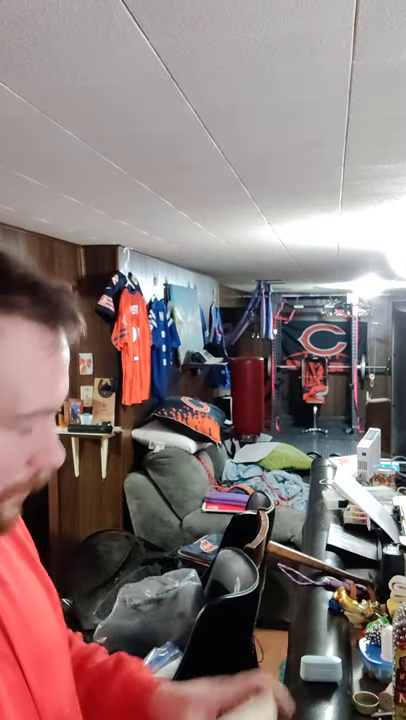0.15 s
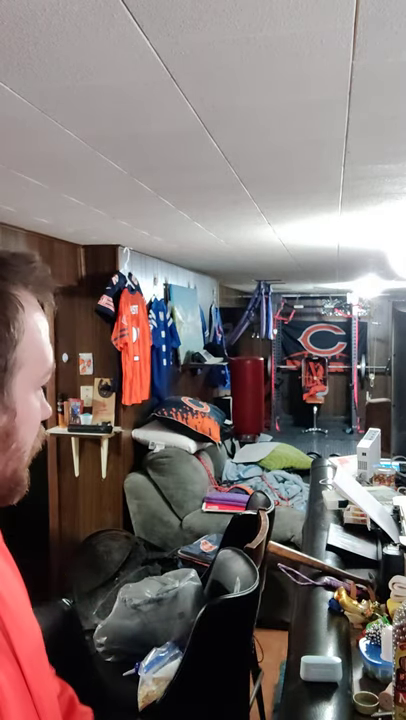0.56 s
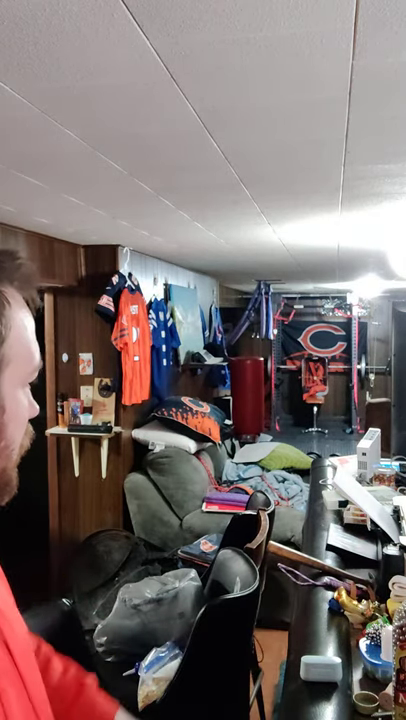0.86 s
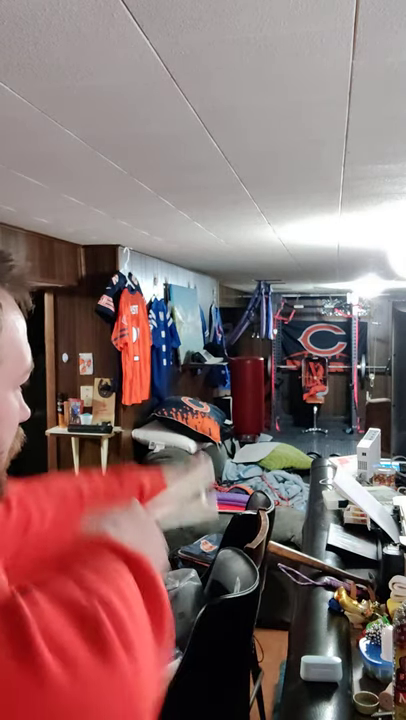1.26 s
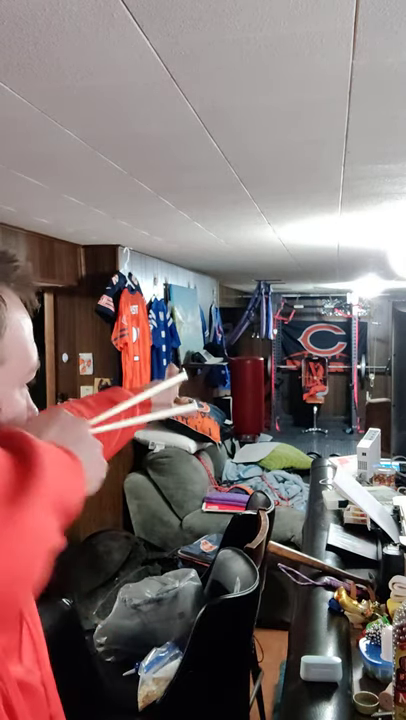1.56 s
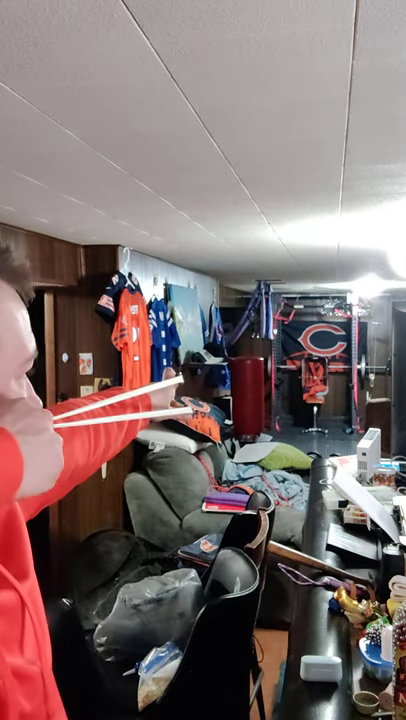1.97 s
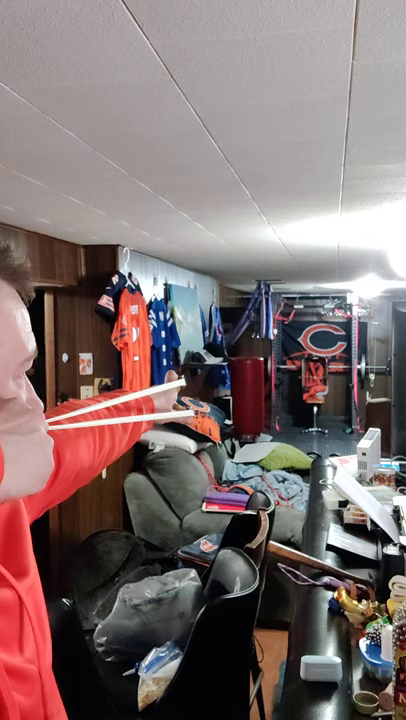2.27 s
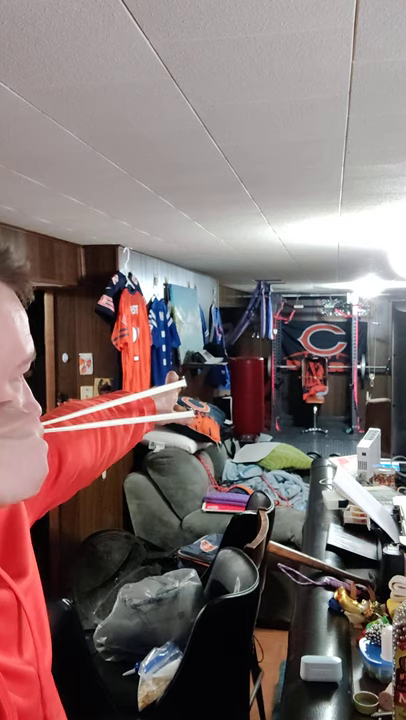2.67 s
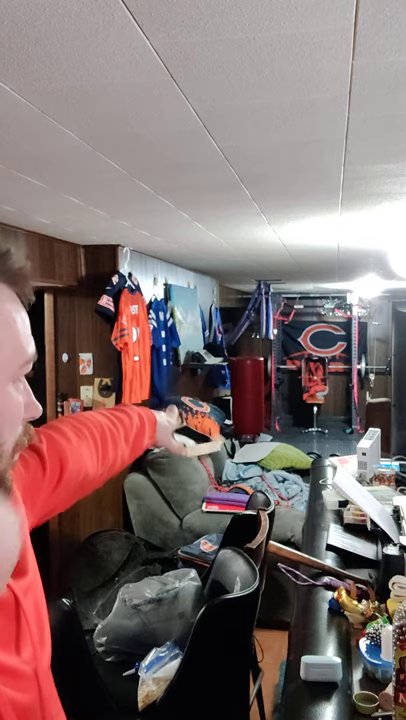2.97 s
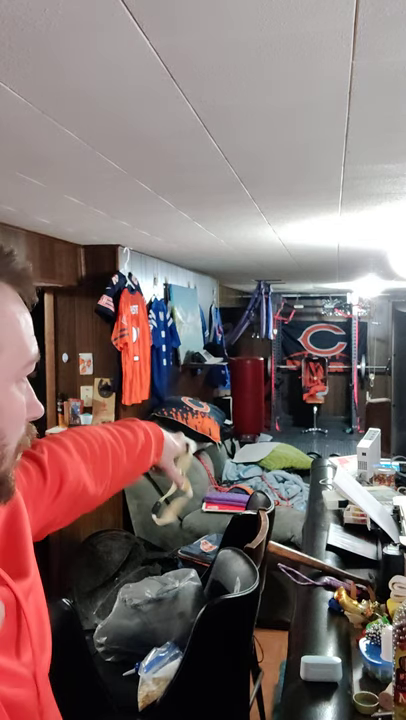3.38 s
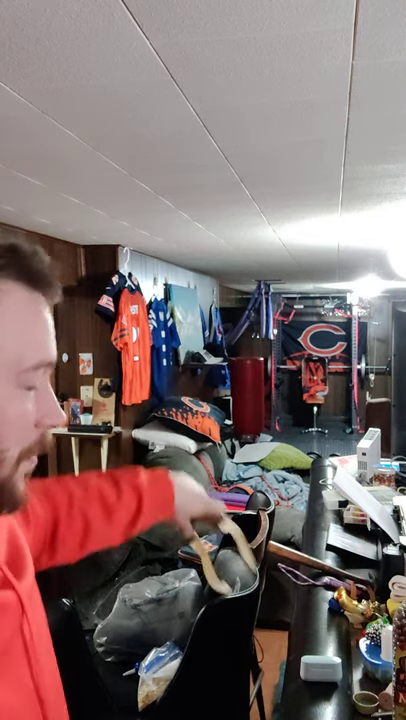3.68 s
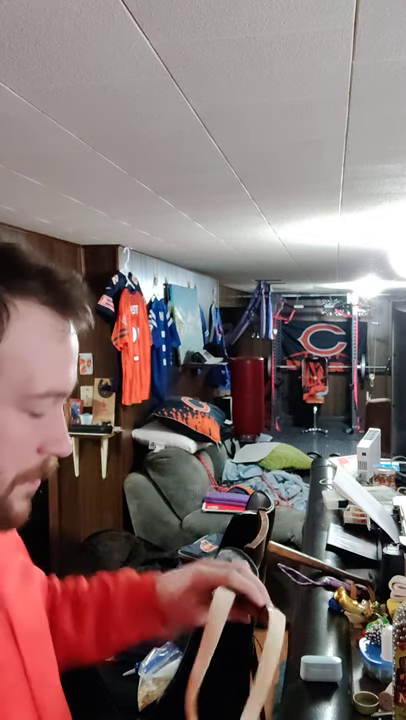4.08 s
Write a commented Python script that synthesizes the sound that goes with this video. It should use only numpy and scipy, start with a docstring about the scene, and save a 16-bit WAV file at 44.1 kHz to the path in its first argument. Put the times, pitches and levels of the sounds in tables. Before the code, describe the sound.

Almost three seconds of very quiet room air and low motor hum, with faint brushing fabric. Then a slingshot released at arm's length slaps sharply, rubber and leather clapping within a few hundredths of a second. A steel ball strikes a distant panel with a fuller, hollow crack, short shudder and quick room echo. It ticks as it drops, and the sleeve brushes while the arm lowers.

```python
"""Slingshot in a basement

Quiet, low basement, phone microphone an arm's length from the slingshot. Ventilation air and a wavering
hum lie under a brushing sleeve. A very short hiss swells into the release; pouch and bands slap as noise
bursts and air pops that ring the fork. A fifth of a second later a steel ball cracks into a target across
the room: bursts, ringing panel, room boom, a shudder of small knocks. The ball ticks twice as it drops."""
import sys
import numpy as np
from scipy import signal
from scipy.fft import rfft, irfft
from scipy.io import wavfile
from scipy.ndimage import uniform_filter1d

SR = 44100
rng = np.random.default_rng(int(sys.argv[2]) if len(sys.argv) > 2 else 0)


def output_pcm(signal):
    """Save a mono or channel-first signal as 16-bit PCM at the path in sys.argv[1].

    Samples are clipped to [-1, 1] before scaling.
    """
    pcm = np.clip(np.atleast_2d(signal).T, -1, 1) * 32767
    wavfile.write(sys.argv[1], SR, np.round(pcm).astype(np.int16))


N = 187116
T = np.arange(N) / SR  # seconds
FREQ = np.maximum(np.arange(N // 2 + 1) * SR / N, 1)  # Hz, kept off zero for the log axis
SHORT = T[:SR // 2]  # the half second given to a ring or an echo


def undb(db):
    """Decibels to gain."""
    return 10 ** (np.asarray(db) / 20)


def unit(x):
    """Scale to an rms of one."""
    return x / np.sqrt(np.mean(x ** 2))


def unit_energy(x):
    """Scale so that the squares sum to one."""
    return x / np.sqrt(np.sum(x ** 2))


def across(rows, hz):
    """Read (Hz, value) rows on a log-frequency axis."""
    points, values = np.transpose(rows)
    return np.interp(np.log(hz), np.log(points), values)


def shape(x, db):
    """Minimum-phase filter with the given gain at every frequency, made by folding the cepstrum."""
    cepstrum = irfft(np.log(undb(db)), N)
    cepstrum[1:N // 2] *= 2
    cepstrum[N // 2 + 1:] = 0
    response = np.exp(rfft(cepstrum))
    return irfft(rfft(x) * response, N)


def soften(x, corner_hz):
    """A softer contact loses its treble."""
    b, a = signal.butter(2, min(corner_hz, 0.45 * SR), fs=SR)
    return signal.lfilter(b, a, x)


def envelope(start, length, attack, release):
    """Attack, hold and release, all within the given length in seconds."""
    rise = (T - start) / attack
    fall = (start + length - T) / release
    return np.clip(np.minimum(rise, fall), 0, 1)


def drift(rate):
    """A smooth random wander with a spread near one, from `rate` random steps a second."""
    size = int(SR / rate)
    steps = np.repeat(rng.standard_normal(N // size + 1), size)
    smooth = uniform_filter1d(uniform_filter1d(steps, size), size)
    return 1.5 * smooth[:N]


def add(track, at, sound):
    """Mix a sound into a track at a time in seconds."""
    start = int(at * SR)
    track[start:start + len(sound)] += sound[:N - start]


def burst(length):
    """A contact: dying noise of unit energy, spread nearly evenly over all frequencies."""
    fade = np.exp(-SHORT / length)
    x = rng.standard_normal(len(SHORT)) * fade
    # a hard contact favours no frequency: level the spectrum, then confine it in time again
    for _ in range(2):
        phase = np.angle(rfft(x))
        x = irfft(np.exp(1j * phase), len(SHORT)) * np.sqrt(fade)
    return unit_energy(x)


def air_pop(width_s):
    """One swing of pressure, of unit energy, from air squeezed out between two surfaces."""
    u = SHORT / width_s - 2
    return unit_energy(u * np.exp(-u ** 2))


def ring(modes):
    """Damped sines of a struck object; neighbouring modes swing in opposite senses."""
    total = 0
    for k, (hz, db, t60) in enumerate(modes):
        decay = np.exp(-np.log(1000) * SHORT / t60)
        total = total + (-1) ** k * undb(db) * np.sin(2 * np.pi * hz * SHORT) * decay
    return total


# reverberation of the basement: pitch_hz, t60_s
BASEMENT_T60 = [(60, 0.29), (250, .33), (700, 0.31), (1500, .27), (5000, 0.26), (8000, 0.22), (15000, 0.21)]


def basement(x, wet_db, gap_s, build_s):
    """Direct sound plus reflections that start sparse, then crowd together and die away band by band."""
    echoes_per_s = 900 * (1 + (SHORT / 0.025) ** 2)
    share = np.minimum(echoes_per_s / SR, 1)  # chance that a sample holds an echo
    signs = rng.choice([-1, 1], len(SHORT))
    arrives = rng.random(len(SHORT)) < share
    echoes = rfft(signs * arrives / np.sqrt(share))
    hz = np.arange(len(echoes)) * SR / len(SHORT)
    onset = 1 - np.exp(-np.maximum(SHORT - gap_s, 0) / build_s)
    edges = np.r_[20, np.geomspace(80, SR / 2, 24)]
    tail = 0
    for lo, hi in zip(edges[:-1], edges[1:]):
        band = irfft(echoes * ((hz >= lo) & (hz < hi)), len(SHORT))
        t60 = across(BASEMENT_T60, np.sqrt(lo * hi))
        band = band * onset * np.exp(-np.log(1000) * SHORT / t60)
        # every band returns the same energy per hertz
        tail = tail + unit_energy(band) * np.sqrt((hi - lo) / (SR / 2))
    return x + undb(wet_db) * signal.fftconvolve(x, tail)[:N]


# colour of the moving air: pitch_hz, level_db
AIR_COLOUR = [(25, -35), (45, -13.5), (85, -1.5), (150, 0), (188, 0), (270, -5.5), (400, -5.5), (750, -10),
              (1200, -7), (1700, -18), (3500, -24.5), (6000, -27), (8000, -38.5), (12500, -42),
              (15000, -53)]
# motor and mains hum: pitch_hz, level_db (before the shared hum gain), phase_wobble_rad
HUM_TONES = [(60, -69.5, .4), (118, -67.5, .4), (182.3, -72, 1.2), (256, -83.5, 0.37), (353, -79.5, 1.2),
             (416, -78.5, 1.8)]
AIR_DB, HUM_GAIN_DB, HUM_WAVER_DB = -63.5, -1.5, 1


def ventilation():
    """Steady soft moving air, as coloured noise, over sines that waver in phase and level."""
    air = unit(shape(rng.standard_normal(N), across(AIR_COLOUR, FREQ)))
    hum = 0
    for hz, db, wobble in HUM_TONES:
        level = undb(db + 0.7 * drift(rate=10))
        tone = unit(np.sin(2 * np.pi * hz * T + wobble * drift(rate=3.2)))
        hum = hum + level * tone
    waver = undb(HUM_GAIN_DB + HUM_WAVER_DB * drift(rate=2.8))
    return air * undb(AIR_DB) + hum * waver


# colour of the brushing cloth: pitch_hz, level_db
SLEEVE_COLOUR = [(30, -10.5), (90, 1.5), (200, 3.5), (400, -8), (1250, -8), (1800, -17), (4000, -25.5),
                 (6000, -26), (8000, -45), (12500, -39), (15000, -45.5)]
# the arm comes up to aim, sinks after the shot, then drops: start_s, length_s, level_db
ARM_STROKES = [(0.044, 1.36, -69.5), (3.1, 0.77, -58.5), (3.718, 0.58, -62)]


def sleeve():
    """Cloth brushing in small uneven strokes whenever the arm gathers speed, moves and comes to rest."""
    cloth = unit(shape(rng.standard_normal(N), across(SLEEVE_COLOUR, FREQ)))
    motion = 0
    for at, length, db in ARM_STROKES:
        motion = motion + undb(db) * envelope(at, length, attack=0.23, release=0.28)
    return cloth * motion * undb(1.1 * drift(rate=16))


# touches of the dropping ball: start_s, level_db (before the shared gain)
BALL_TICKS = [(3.245, -26.5), (3.5174, -42.5)]
# colour of a tick: pitch_hz, level_db
TICK_COLOUR = [(300, -35), (2500, -9), (4700, 3), (5300, 1), (5750, 11), (6200, 6.5), (8000, -8),
               (12000, -14), (15300, -14)]


def dropping_ball():
    """Steel touches down with tiny bright ticks, heard with the room around them."""
    ticks = np.zeros(N)
    for at, db in BALL_TICKS:
        add(ticks, at, undb(db) * burst(length=0.012))
    coloured = undb(9) * shape(ticks, across(TICK_COLOUR, FREQ))
    return basement(coloured, wet_db=-1.5, gap_s=0.003, build_s=0.005)


# blows of the ball on the panel and its backing, before the shared gains:
# start_s, level_db, length_s, brightness_corner_hz, push_on_panel_db
BALL_BLOWS = [(3.1223, -2, 0.0034, 4000, -4), (3.1252, 1, .006, 15000, -2.5),
              (3.1395, -9, 0.0057, 15000, -18)]
# colour of the target shuddering against its backing: pitch_hz, level_db
SHUDDER_COLOUR = [(50, -6.5), (100, -2.5), (200, -6), (300, -7.5), (450, 0), (700, 3), (1150, 4.5),
                  (1500, -6.5), (2500, -9.5), (4500, -13), (6300, -14.5), (8000, -31.5), (15000, -38)]
SHUDDER_DB, SHUDDER_FALL_DB_PER_S = -26, 180
SHUDDER_ATTACK_S, SHUDDER_LENGTH_S, SHUDDER_RELEASE_S = 0.04, 0.1233, 0.015


def shudder():
    """From the last blow, many small uneven knocks build up and die away until the target settles."""
    knocks_per_s, spread_db = 900, 3
    hit = rng.random(N) < knocks_per_s / SR
    size = rng.standard_normal(N)
    knocks = hit * np.sign(size) * undb(spread_db * np.abs(size))
    # every knock is smeared by the surfaces around the target
    knocks = signal.fftconvolve(knocks, burst(length=0.0066))[:N]
    start = BALL_BLOWS[-1][0]
    falling_s = np.maximum(T - start - SHUDDER_ATTACK_S, 0)
    level = undb(SHUDDER_DB - SHUDDER_FALL_DB_PER_S * falling_s)
    shaking = level * envelope(start, SHUDDER_LENGTH_S, SHUDDER_ATTACK_S, SHUDDER_RELEASE_S)
    return unit(shape(knocks, across(SHUDDER_COLOUR, FREQ))) * shaking


# colour of the crack: pitch_hz, level_db
CRACK_COLOUR = [(40, -6), (90, 5), (200, 7.5), (350, 2.5), (580, -2), (880, 7), (1200, 7), (1500, 0.5),
                (2700, -1.5), (3600, -2), (5800, 1), (6600, -4), (8000, -19), (15500, -27.5)]
# ring of the target panel: pitch_hz, level_db, t60_s
TARGET_RING = [(695, -11, 0.056), (795, -7.5, .035), (989, -21, 0.12), (1154, -29.5, 0.29),
               (2598, -11.5, .025), (5640, -14.5, .03)]
# standing waves between floor, ceiling and walls: pitch_hz, level_db, t60_s
ROOM_BOOM = [(79.6, -22, 0.19), (92.3, -28.5, 0.24), (121.6, -28.5, 0.17), (193.4, -31.5, .28)]


def target():
    """Across the room the ball cracks against the panel, rings it, drives into the backing and stirs the room."""
    cracks, panel, boom = np.zeros(N), np.zeros(N), np.zeros(N)
    for at, db, length, bright_hz, push_db in BALL_BLOWS:
        add(cracks, at, undb(db) * soften(burst(length), bright_hz))
        add(panel, at, undb(push_db) * ring(TARGET_RING))
    crack = undb(11.5) * shape(cracks, across(CRACK_COLOUR, FREQ))
    # the standing waves take a few crossings of the room to form
    forming = 1 - np.exp(-SHORT / 0.0031)
    add(boom, BALL_BLOWS[0][0], ring(ROOM_BOOM) * forming)
    # far away, so the echoes build for longer than those of the slingshot
    heard = basement(crack, wet_db=1.5, gap_s=0.00067, build_s=0.0029)
    return heard + undb(-5) * panel + undb(5) * boom


def swell():
    """A short hiss swells faster and faster, then stops at the release."""
    stop_s, grow_s = 2.9395, 0.0035
    growth = np.exp(np.minimum(T - stop_s, 0) / grow_s)
    return undb(-37) * rng.standard_normal(N) * growth * (T < stop_s)


# slaps of pouch and bands, before the shared gains (pop_db is relative to the slap):
# start_s, level_db, length_s, brightness_corner_hz, pop_db, push_on_fork_db
BAND_SLAPS = [(2.9389, -2.5, 0.0068, 6525, -21, -9), (2.9522, -7, .001, 2442, 2.5, -5),
              (2.9541, -0.5, 0.0037, 15020, -24.5, 1.5), (2.963, -15.5, .006, 15000, -9, -21),
              (2.9797, -8.5, 0.0025, 11010, -11.5, -8.5)]
# colour of rubber on leather and fork: pitch_hz, level_db
RUBBER_COLOUR = [(40, -6.5), (100, 4), (250, -3.5), (450, -0.5), (800, -6.5), (1250, -6.5), (2400, -6.5),
                 (3500, -4), (4700, -1.5), (6400, 1.5), (8000, -8.5), (11000, -10.5), (15500, -8.5)]
# ring of the fork and pouch: pitch_hz, level_db, t60_s
FORK_RING = [(93, -23.5, .07), (398, -25.5, 0.11), (1244, -10, 0.028), (1856, -17.5, 0.039),
             (5380, -26.5, 0.19), (5800, -26.5, 0.13)]


def slingshot():
    """Around the end of a short swelling hiss the slaps begin: contact noise, a pop of air, a ringing fork."""
    slaps = soften(swell(), corner_hz=5000)
    fork = np.zeros(N)
    for at, db, length, bright_hz, pop_db, push_db in BAND_SLAPS:
        contact = soften(burst(length), bright_hz)
        pop = undb(pop_db) * air_pop(width_s=0.00019)
        add(slaps, at, undb(db) * (contact + pop))
        add(fork, at, undb(push_db) * ring(FORK_RING))
    snap = undb(10.5) * shape(slaps, across(RUBBER_COLOUR, FREQ))
    heard = basement(snap, wet_db=4, gap_s=0.00097, build_s=0.002)
    return heard + undb(-5.5) * fork


def scene():
    """Shot, hit and falling ball over the quiet of the basement."""
    shot_and_hit = slingshot() + target() + shudder() + dropping_ball()
    background = ventilation() + sleeve()
    return (shot_and_hit + background)[None]


# colour of the microphone port: pitch_hz, width_hz, level_db
PORT_COLOUR = [(1620, 94, -9), (3222, 120, -4), (5575, 260, 2.5)]


def record(dry):
    """The phone colours the sound with its port, drops the rumble, rounds the peaks and cuts the top."""
    port_db = 0
    for hz, width, db in PORT_COLOUR:
        port_db = port_db + db * np.exp(-((FREQ - hz) / width) ** 2)
    coloured = shape(dry[0], port_db)
    rumble_cut = signal.butter(4, 38, "high", fs=SR, output="sos")  # Hz
    x = signal.sosfilt(rumble_cut, coloured)
    ceiling = 0.75
    rounded = ceiling * np.tanh(x / ceiling)
    top_cut = signal.ellip(10, 0.2, 70, 15700, fs=SR, output="sos")  # ripple dB, stop dB, Hz
    return signal.sosfilt(top_cut, rounded)[None]


dry = scene()
out = record(dry)
output_pcm(out)
```